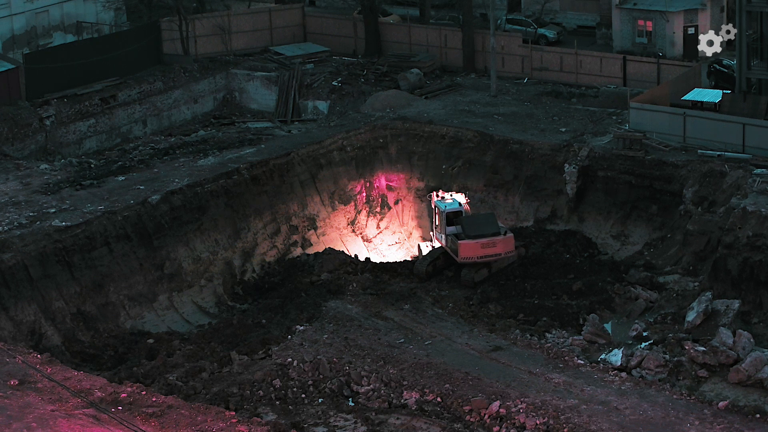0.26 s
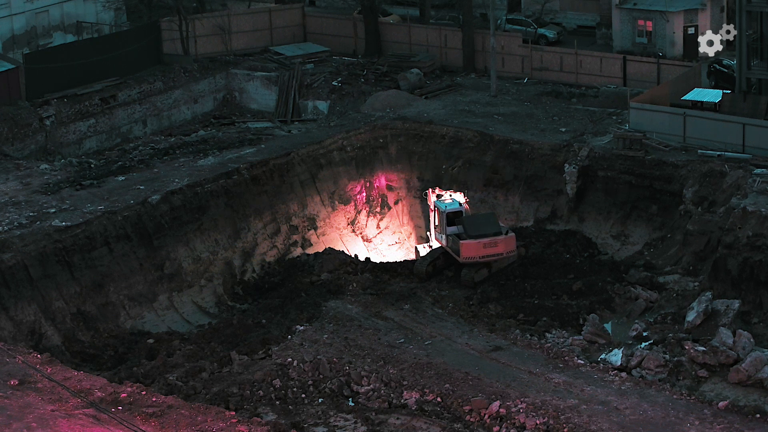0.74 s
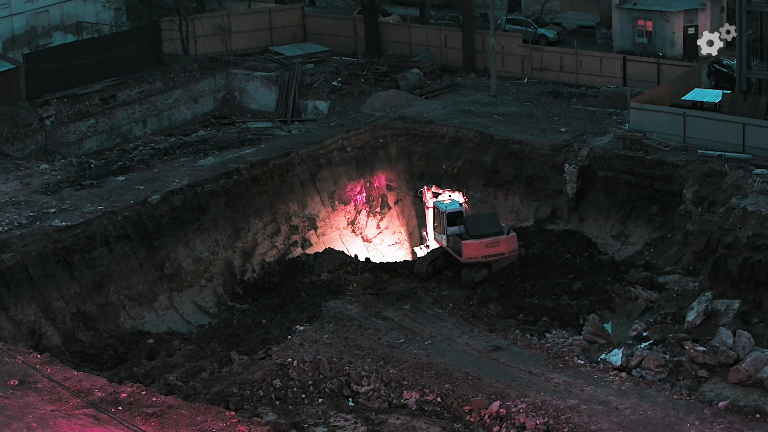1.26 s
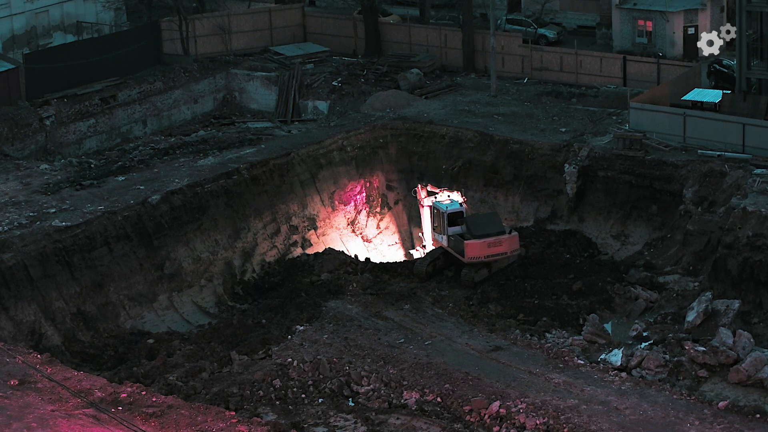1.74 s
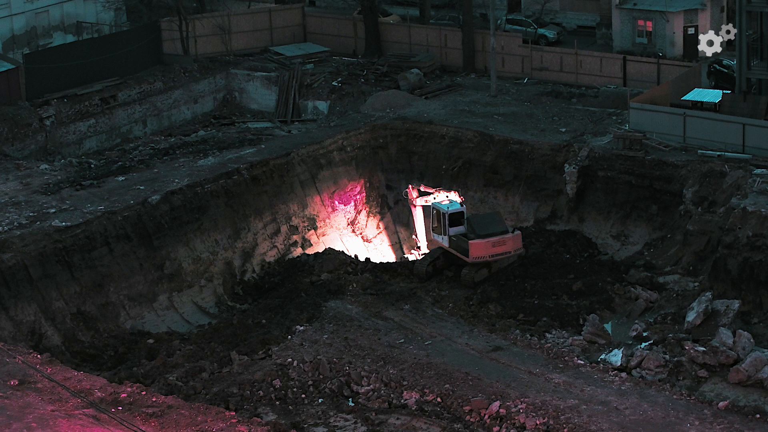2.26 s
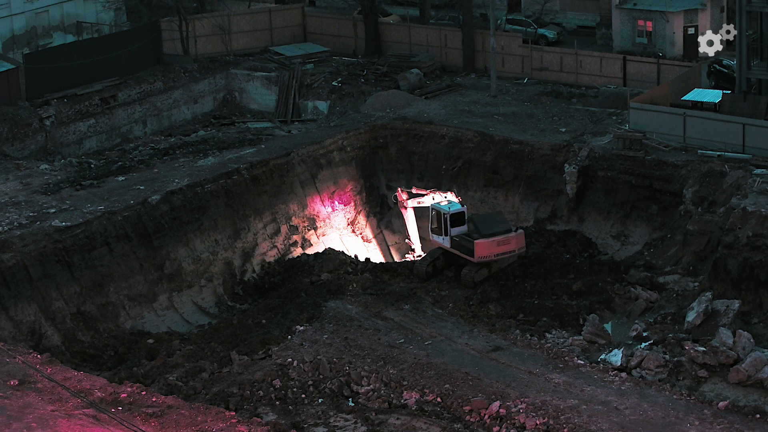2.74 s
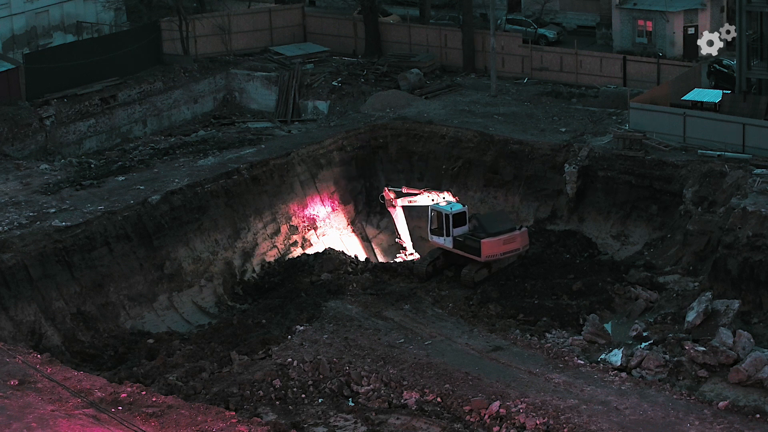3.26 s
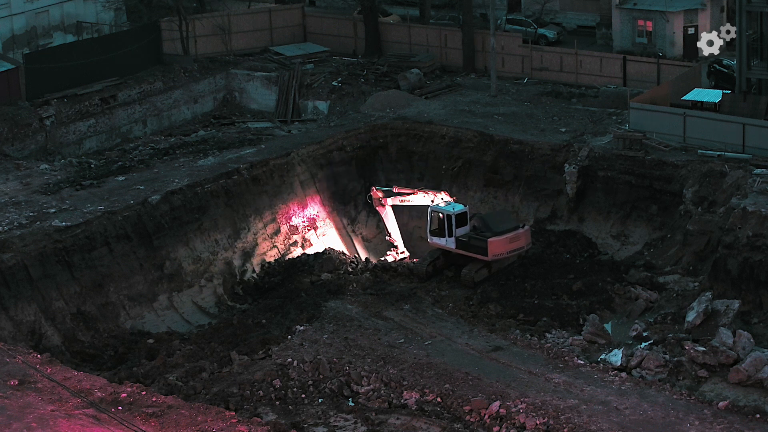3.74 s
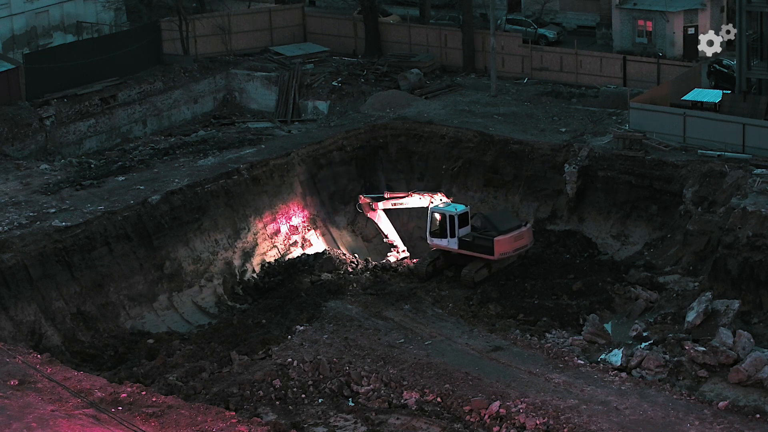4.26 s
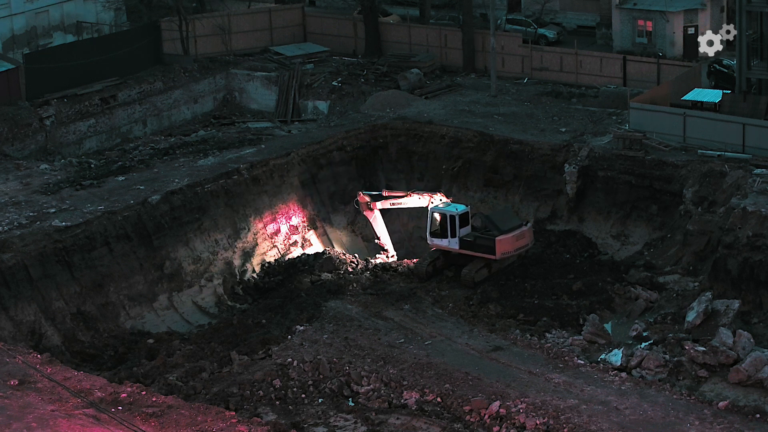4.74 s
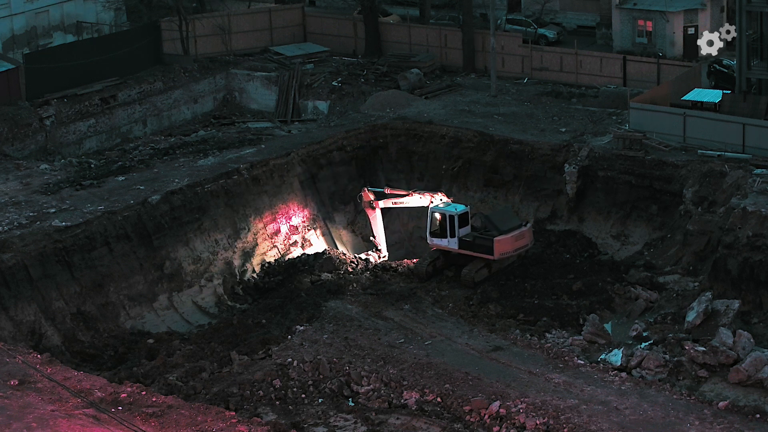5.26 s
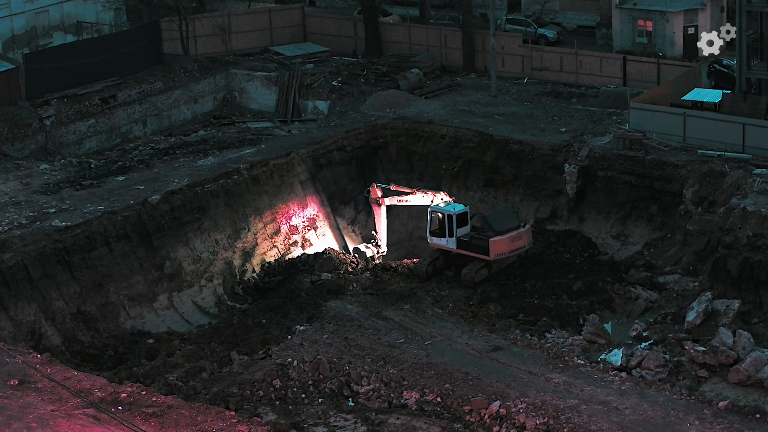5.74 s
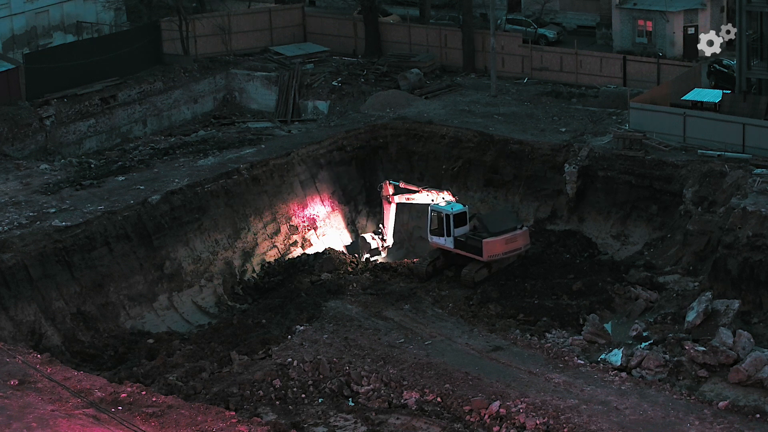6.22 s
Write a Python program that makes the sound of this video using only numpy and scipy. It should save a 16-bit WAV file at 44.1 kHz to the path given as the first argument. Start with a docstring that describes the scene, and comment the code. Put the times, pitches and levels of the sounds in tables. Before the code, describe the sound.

Strong wind thuds and rumbles on an unprotected microphone, heaviest in the first three seconds and distorting at its peaks. Beneath it, a distant diesel excavator drones steadily with a rough knock and hydraulic whine. After four seconds its steel bucket crunches through soil and stones with dull clanks and a faint squeal. The engine then continues in lighter wind. Outdoors, heard from far above an earth pit.

```python
"""A diesel excavator works at the bottom of a pit, heard from far above in gusty wind.
One shaft paces firing noise that rings the engine block, sines for the engine, gears and piston pump,
and puffed noise for exhaust and cooling air. The bucket's stones and soil are noise through steel
resonances. Wind in front is filtered noise in gusts that drives the microphone to its limits."""
import sys
import numpy as np
from scipy import signal
from scipy.fft import rfft, irfft, next_fast_len
from scipy.io import wavfile
from scipy.ndimage import uniform_filter1d, minimum_filter1d, map_coordinates

SR = 44100
rng = np.random.default_rng(int(sys.argv[2]) if len(sys.argv) > 2 else 0)


def voltage_ratio(level):
    """Linear amplitude factor for a level in decibels (scalar or array-like)."""
    return 10 ** (np.asarray(level, float) / 20)


def put_to_file(sound):
    """Save the sound as 16-bit audio at rate SR, in the file named by the first command-line argument."""
    columns = np.atleast_2d(sound).T  # one column per channel
    safe = np.clip(columns, -1, 1)
    whole_steps = np.round(safe * 32767)
    wavfile.write(sys.argv[1], SR, whole_steps.astype(np.int16))


N = 286341


def unit(x):
    """Normalisation: scale to rms 1."""
    return x / np.sqrt(np.mean(x ** 2) + 1e-20)


def curves(rows):
    """Linear interpolation: one value per sample for each column after the time."""
    s, *cols = np.transpose(rows)
    return [np.interp(np.arange(N) / SR, s, c) for c in cols]


def wobble(rate):
    """Band-limited randomness: a smooth spline through random knots, rate knots a second."""
    at = np.arange(0, N + 32, 32)
    knots = rng.standard_normal(int(N * rate / SR) + 4)
    return np.interp(np.arange(N), at, map_coordinates(knots, [at * rate / SR]))


def filtered(x, response):
    """Linear filtering: multiply the spectrum by a complex response of frequency."""
    m = next_fast_len(N + SR // 2)
    return irfft(rfft(x, m) * response(np.fft.rfftfreq(m, 1 / SR)), m)[:N]


def coloured(x, spectrum):
    """Spectral shaping: a filter through (Hz, dB) points on a log axis, brought to rms 1."""
    f, db = np.transpose(spectrum)
    return unit(filtered(x, lambda hz: voltage_ratio(np.interp(np.log(hz + 1), np.log(f + 1), db))))


def resonances(modes):
    """Modal superposition: causal response of (Hz, width Hz, dB) modes in alternating sign."""
    def response(f):
        total = 0
        for k, (centre, width, db) in enumerate(modes):
            damping = 1j * f * width
            total = total + (-1) ** k * voltage_ratio(db) * damping / (centre * centre - f * f + damping)
        return total
    return response


def steadied(x, share):
    """Envelope compression: even out part of a noise's own swelling, so the event sets its size."""
    x = unit(x)
    size = np.abs(signal.hilbert(x, next_fast_len(len(x)))[:len(x)])
    return unit(x / (size + 0.73) ** share)


def swell(s, length_s, rise_s, fall_s):
    """Event envelope: smooth rise centred on s, hold, exponential fall by two time constants in fall_s."""
    t = np.arange(N) / SR - s
    rise = np.sin(np.pi / 2 * np.clip(t / rise_s + .5, 0, 1)) ** 2
    return rise * np.exp(-np.clip(t - length_s, 0, None) / fall_s * 2)


def patchy(depth_db):
    """Random gain: noise with smooth patches of louder and softer level in time and pitch."""
    z = signal.stft(rng.standard_normal(N), nperseg=512)[2]
    field = uniform_filter1d(rng.standard_normal(z.shape), 6, axis=0)
    field = uniform_filter1d(field, 14, axis=1)
    return signal.istft(z * voltage_ratio(depth_db * unit(field)), nperseg=512)[1][:N]


def tone(turns, waver_db):
    """Sinusoid with random modulation: a phase in turns, level and phase wavering at random."""
    level = np.sqrt(2) * voltage_ratio(waver_db * wobble(8.4))
    return level * np.sin(2 * np.pi * turns + 1.91 * wobble(5))


def air(x):
    """Atmospheric absorption: the long path takes the top off sharp sounds."""
    return signal.sosfilt(signal.butter(5, 4600, fs=SR, output="sos"), x)


def pit(x):
    """Reverberation: the earth walls answer with a short dull tail."""
    t = np.arange(SR // 2) / SR
    tail = signal.lfilter([.4], [1, -.6], rng.standard_normal(len(t))) * voltage_ratio(-60 * t / 0.38)
    delayed = np.pad(x, (600, 0))
    return signal.fftconvolve(delayed, tail / np.linalg.norm(tail))[:N]


# single hard eddies inside the gusts: centre_s, level_db (before the pulse envelope), pitch_hz
EDDY_THUMPS = [(0.213, -16, 60), (0.251, -16, 55), (.62, -7.5, 60), (0.765, -11, 60.3), (1.044, -6.5, 48.6),
               (1.185, -13.5, 100), (1.288, -8.5, 52.6), (1.427, -10.5, 38.1), (1.964, -19, 40),
               (2.2, -11.5, 35), (2.3, -13.5, 35), (2.5, -9, 40), (2.555, -5, 40.5), (2.642, -6, 33),
               (2.662, -21.5, 150), (2.675, -15.5, 130), (2.694, -18, 140), (2.713, -13, 109.5),
               (2.735, -15, 121), (2.899, -15.5, 49.96), (3.023, -24, 120), (3.041, -9, 65.5),
               (3.165, -13, 37.97), (4.362, -20.5, 32), (4.89, -14, 35)]


def thumps():
    """Pressure pulse: each hard eddy swings the diaphragm once, out and then back in."""
    out, t = np.zeros(N + SR), np.arange(-SR // 10, SR // 10) / SR
    for s, db, hz in EDDY_THUMPS:
        pulse = np.sin(2 * np.pi * hz * t) * np.exp(-(1.92 * hz * t) ** 2)
        out[round(s * SR) - SR // 10:][:len(t)] -= voltage_ratio(db) * pulse
    return out[:N]


# gusts on the microphone: start_s, length_s, strength_db,
# quickness_db (how much small fast eddies gain on the large)
WIND_GUSTS = [(0, 0.0087, -22.5, -3), (0.125, 0.079, -24, -3), (0.183, 0.092, -21, 5.5),
              (0.258, 0.19, -21.5, 3.5), (0.408, 0.041, -27, 0), (0.524, 0.11, -19.5, 8),
              (0.638, 0.15, -20, 9), (0.786, 0.063, -15.5, 0), (0.895, 0.19, -16.5, 3.5),
              (1.07, .06, -10, -4), (1.148, 0.041, -18.5, 9.5), (1.23, 0.25, -20.5, 6),
              (1.324, 0.14, -26, 7), (1.471, 0.14, -23, 3.5), (1.66, 0.17, -32.5, 2),
              (1.949, 0.028, -18.5, -1.5), (2.088, 0.14, -27.5, -2.5), (2.274, 0.079, -17.5, -3.5),
              (2.4, 0.056, -27.5, -5), (2.504, 0.051, -11.5, -21), (2.594, 0.078, -9.5, -6),
              (2.655, 0.072, -21, 10.5), (2.777, 0.17, -18.5, -3), (3, 0.13, -19, 2.5),
              (3.121, 0.11, -19.5, -6.5), (3.325, 0.12, -23.5, -0.5), (3.509, 0.1, -30, 3.5),
              (3.673, 0.24, -19, -2), (3.966, 0.18, -17.5, -2), (4.214, 0.033, -15, -3.5),
              (4.331, 0.023, -14.5, -7.5), (4.422, 0.32, -24, -1), (4.78, 0.12, -22, 4),
              (4.94, 0.1, -19.5, 6), (5.021, 0.047, -24, 0), (5.116, 0.14, -23.5, -9),
              (5.402, 0.17, -25.5, -6.5), (6.001, 0.084, -27.5, -27), (6.212, 0.22, -27, -4)]
# relative spectra of large, middle and small eddies: frequency_hz, level_db
BUFFET_SPECTRUM = [(4.7, -31.5), (8.0, 9.5), (33, 7), (90, -20), (120, -16), (200, -120)]
FLUTTER_SPECTRUM = [(29, -36), (50, 0.5), (90, -6), (130, -21), (170, -46.5), (290, -120)]
RASP_SPECTRUM = [(80, -26), (125, 0.5), (200, -10), (280, -17.5), (420, -26.5), (560, -54), (990, -120)]
GUST_RISE_S, GUST_FALL_S = .07, 0.097
BREEZE_DB, BREEZE_QUICK_DB = -35.5, -7.5  # strength and quickness between gusts
FLUTTER_DB, RASP_DB = -9.5, -23.5  # relative to the buffet at zero quickness
FLUTTER_GROWS, RASP_GROWS = 0.93, 1.23  # share of the quickness each one gains


def gust_size(shapes, grows):
    """Energy addition: gusts and breeze sum as powers, each raised by its quickness."""
    db, quick_db = np.transpose(WIND_GUSTS)[2:]
    gusts = voltage_ratio(db + grows * quick_db) ** 2 @ shapes ** 2
    return np.sqrt(gusts + voltage_ratio(BREEZE_DB + grows * BREEZE_QUICK_DB) ** 2)


def wind():
    """Turbulent pressure: eddies of three sizes press on the diaphragm, the quick riding on the large."""
    shapes = np.array([swell(s, length_s, GUST_RISE_S, GUST_FALL_S) for s, length_s, _, _ in WIND_GUSTS])
    eddy = wobble(20)
    buffet = steadied(coloured(rng.standard_normal(N), BUFFET_SPECTRUM), share=0.21)
    flutter = steadied(coloured(rng.standard_normal(N), FLUTTER_SPECTRUM), share=0.13)
    rasp = coloured(voltage_ratio(1.4 * wobble(35)) * rng.standard_normal(N), RASP_SPECTRUM)
    push = gust_size(shapes, 0) * voltage_ratio(1.0 * eddy) * buffet
    push += gust_size(shapes, FLUTTER_GROWS) * voltage_ratio(FLUTTER_DB + 2.4 * eddy) * flutter
    push += gust_size(shapes, RASP_GROWS) * voltage_ratio(RASP_DB + 1.8 * eddy) * rasp
    push += thumps()
    return push / (1 + (push / .43) ** 4) ** (1 / 4)  # the diaphragm stiffens at full travel


# modes of the bucket steel: pitch_hz, width_hz, level_db
STEEL_MODES = [(482, 94, -3), (670, 85, 6), (838, 46, 1.5), (1065, 75, 4.5), (1510, 77, -2),
               (1640, 53, 4.5), (1940, 150, -11.5), (2280, 41, 1.5), (2710, 240, -4), (3180, 103.4, -6),
               (4000, 140, -12.5), (4350, 100, -1)]


def through_steel(x, direct):
    """Modal resonance: the bucket steel rings beside the direct sound."""
    ring = resonances(STEEL_MODES)
    return filtered(x, lambda hz: direct + ring(hz))


# bucket blows: start_s, level_db (before touch and steel), t60_s, centre_hz,
# spread (band edge over centre; narrow = one mode rings out)
STONE_BLOWS = [(3.482, -36, 0.15, 550, 2.7), (4.01, -39.5, 0.049, 900, 1.8),
               (4.106, -34.5, 0.081, 2550, 1.34), (4.107, -32.5, 0.051, 1065, 1.2),
               (4.12, -37.5, 0.2, 1700, 2.2), (4.148, -45, .06, 2200, 1.6),
               (4.176, -40.5, 0.21, 1000, 1.53), (4.339, -37, 0.077, 3000, 1.1),
               (4.349, -29.5, 0.03, 1640, 1.13), (4.352, -32, 0.14, 1470, 3.1),
               (4.36, -31, 0.066, 1065, 1.21), (4.368, -36, 0.086, 670, 1.3), (4.39, -42, 0.073, 810, 1.1),
               (4.435, -38, 0.041, 1065, 1.2), (4.518, -39, 0.068, 450, 2), (4.538, -43, .07, 880, 1),
               (4.525, -44, 0.11, 2600, 1.1), (4.553, -36.5, 0.085, 480, 1.5),
               (4.565, -38, 0.078, 1300, 1.5), (4.59, -42, .12, 2500, 2), (4.646, -42, .1, 2600, 1.2),
               (4.575, -33, 0.09, 500, 2.3), (4.597, -34.5, 0.083, 895.6, 1.4),
               (4.612, -36, 0.064, 1192, 1.4), (4.63, -35, .06, 1400, 1.6), (4.655, -35, 0.06, 1400, 1.34),
               (4.665, -35, 0.063, 600, 1.9), (4.69, -45, 0.059, 895, 2.5), (4.72, -39, .07, 800, 1.5),
               (4.782, -38.5, 0.086, 1065, 0.96), (4.792, -46, 0.14, 650, 0.92),
               (4.835, -37, 0.056, 700, 2.4), (4.86, -41, .05, 1190, 2), (4.915, -38, 0.055, 800, 1.3),
               (4.954, -47, 0.06, 700, 2.8)]


def stones():
    """Impact excitation: stones strike the bucket as short noise bursts that ring its steel."""
    t, rattle = np.arange(SR // 4) / SR, np.zeros(N + SR)
    touch = 1 + 1.5 * voltage_ratio(-60 * t / .02)  # hard first touch, then rubble
    onset = 1 - np.exp(-t / 0.0018)
    for s, db, t60, centre_hz, spread in STONE_BLOWS:
        spread = max(spread, 1.03)
        band = signal.butter(2, [centre_hz / spread, centre_hz * spread], "band", fs=SR, output="sos")
        noise = signal.sosfilt(band, rng.standard_normal(2 * len(t)))[len(t):]
        decay = voltage_ratio(db - 60 * t / t60)
        rattle[round(s * SR):][:len(t)] += decay * onset * touch * steadied(noise, share=.9)
    return through_steel(rattle[:N], direct=.3)


# soil sliding over the bucket: start_s, length_s, level_db
SOIL_SCRAPES = [(3.462, 0.034, -47), (4.085, 0.055, -50), (4.325, 0.022, -39.5), (4.52, 0.035, -42),
                (4.565, 0.066, -42), (4.666, 0.031, -43.5), (4.736, 0.16, -47), (4.892, 0.13, -51.5)]
# relative spectrum of the soil before the steel: frequency_hz, level_db
SOIL_SPECTRUM = [(120, -39), (200, -12.5), (285, 0.5), (324, -6.5), (364, -2), (1510, -12), (4260, -26.5),
                 (6000, -36), (7800, -82), (13200, -120)]


def soil():
    """Granular friction: random grain impacts crunch along the bucket and colour with its steel."""
    grains = (rng.random(N) < 700 * voltage_ratio(3 * wobble(40)) / SR) * rng.standard_normal(N)
    crunch = coloured(unit(grains) + .45 * rng.standard_normal(N), SOIL_SPECTRUM)
    crunch = unit(through_steel(crunch, direct=3.7))
    slide = sum(voltage_ratio(db) * swell(s, length_s, rise_s=0.065, fall_s=0.12) for s, length_s, db in SOIL_SCRAPES)
    return slide * voltage_ratio(1.2 * wobble(45)) * crunch  # soil comes in clods


# a tooth dragging free: time_s, pitch_hz, level_db (both jittered)
TOOTH_SQUEAL = [(4.76, 2680, -72), (4.8, 2640, -64), (4.88, 2600, -62), (4.93, 2700, -61.5),
                (5.0, 2940, -61), (5.03, 3060, -65), (5.065, 3220, -65), (5.09, 3400, -75)]


def squeal():
    """Frictional self-oscillation: a tooth sings one gliding, jittering tone as it drags free."""
    pitch_hz, level_db = curves(TOOTH_SQUEAL)
    sample = np.arange(N)
    dragging = (sample > TOOTH_SQUEAL[0][0] * SR) & (sample < TOOTH_SQUEAL[-1][0] * SR)
    turns = np.cumsum(pitch_hz + 35 * wobble(90)) / SR
    return dragging * voltage_ratio(level_db + 2 * wobble(45)) * np.sqrt(2) * np.sin(2 * np.pi * turns)


def bucket():
    """Superposition: stones, sliding soil and the squealing tooth add up at the bucket."""
    return stones() + soil() + squeal()


def piston_strokes(load, away):
    """Speed droop: hydraulic load slows the shaft, further after the swing; returns summed strokes."""
    free_hz, droop_hz, late_droop_hz = 220.16, 3.5, 6.2
    return np.cumsum(free_hz - (droop_hz + (late_droop_hz - droop_hz) * away) * load) / SR


def combustion(firing):
    """Pulsed combustion: each firing gives a fast rise and slower fall, and one sharp blow."""
    size = voltage_ratio(1.1 * rng.standard_normal(int(firing[-1]) + 1))[firing.astype(int)]
    phase = firing % 1
    burst = size * (1 - np.exp(-phase / 0.069)) * np.exp(-phase / 0.43)
    crack = unit(size * np.diff(np.floor(firing), prepend=0))
    return burst, crack


# relative spectrum of exhaust and fan: frequency_hz, level_db
ROAR_SPECTRUM = [(60, -30), (95, 5), (125, -6), (170, -8), (275, -2.5), (400, -9.5), (900, -9.5),
                 (2100, -15.5), (2400, -18.5), (5000, -25), (5500, -32), (8200, -37), (8800, -45),
                 (10600, -53), (13000, -99.5)]


def exhaust_roar(burst):
    """Amplitude modulation: exhaust and fan noise is puffed by each firing."""
    return coloured((1 + 0.082 * burst) * patchy(depth_db=1.5), ROAR_SPECTRUM)


# engine block modes: pitch_hz, width_hz (for one of two passes), level_db (relative)
BLOCK_MODES = [(1013, 100, 1), (1388, 120, 3), (1498, 138, 4.5), (1754, 85, -1.5), (1908, 140, 2),
               (2158, 150, -10), (2902, 67, -2), (3744, 480, -13), (4700, 160, -16), (7550, 1300, -27)]
UPPER_DB, SWUNG_UPPER_DB = 1.5, -1.1  # added to modes after the third, and their change by the swing


def block_knock(burst, crack, away):
    """Modal resonance: every firing rings the engine block, each mode with its own noise."""
    modes = []
    for hz, width, db in BLOCK_MODES:
        push = unit(burst * rng.standard_normal(N)) + .7 * crack
        mode = resonances([(hz, width, 0)])
        modes.append(voltage_ratio(db) * filtered(push, lambda f: mode(f) ** 2))
    # the upper modes beam, so they follow the swing of the cab
    return unit(sum(modes[:3]) + voltage_ratio(UPPER_DB + SWUNG_UPPER_DB * away) * sum(modes[3:]))


# engine tones: multiple of the shaft speed, level_db (at full load, before the swing)
ENGINE_ORDERS = [(2, -43.5), (4, -51), (6, -56.5), (12, -56), (48, -60.5)]


def engine_tones(shaft, load, away):
    """Engine orders: sines at whole multiples of the shaft speed swell under load."""
    change_db = -1.5 * away + 6.5 * (load - 1.0)
    return sum(voltage_ratio(db + change_db) * tone(k * shaft, waver_db=4.0) for k, db in ENGINE_ORDERS)


# timing and pump-drive gears, each with a partner one firing rate above:
# multiple of the shaft speed, level_db (before the swing and the firing bursts)
GEAR_TONES = [(60.6, -60.5), (62.6, -60.5), (78.9, -67), (80.9, -68), (119.2, -72.5), (121.2, -72.5)]


def gears(shaft, burst, shaded):
    """Gear meshing: tones tied to the shaft, with scattered phase, pulse with each firing."""
    total = 0
    for k, db in GEAR_TONES:
        turns = k * shaft + .25 * wobble(45)
        total = total + voltage_ratio(db - 8.5 * shaded) * tone(turns, waver_db=5.5) * (1 + .5 * burst)
    return total


# weaker pump harmonics: multiple of the piston rate, level_db
PUMP_HARMONICS = [(1, -57.5), (4, -64), (5, -61.5), (6, -61.5), (8, -65), (10, -72), (12, -73)]
# strong pump harmonics with no load, and their change at full load
SECOND_DB, SECOND_LOAD_DB, THIRD_DB, THIRD_LOAD_DB = -56, -6.5, -61.5, 12


def pump_whine(strokes, load):
    """Flow ripple: the piston pump whines at harmonics of its stroke rate, balanced by the load."""
    whine = voltage_ratio(SECOND_DB + SECOND_LOAD_DB * load) * tone(2 * strokes, waver_db=2.5)
    whine += voltage_ratio(THIRD_DB + THIRD_LOAD_DB * load) * tone(3 * strokes, waver_db=.6)
    for k, db in PUMP_HARMONICS:
        whine += voltage_ratio(db) * tone(k * strokes + .1 * wobble(25), waver_db=2.5)
    return whine


# relative spectrum of the cooling air's treble: frequency_hz, level_db
HISS_SPECTRUM = [(5500, -64), (7000, -8.5), (7800, 4), (8400, -9.5), (9500, -1), (10500, -14), (12000, -63)]


def cooling_hiss(burst, away):
    """Broadband flow noise: the treble of the cooling air, puffed by each firing."""
    level_db = -78.5 - 4.5 * away + 3.0 * wobble(2.8) + 1.5 * wobble(7)
    return voltage_ratio(level_db) * coloured((1 + burst) * patchy(depth_db=5.0), HISS_SPECTRUM)


def whistle(away):
    """Fixed-pitch sinusoid: a thin steady whistle emerges with the swing."""
    return away * voltage_ratio(-91) * tone(7870 * np.arange(N) / SR, waver_db=4)


def late_fan(burst):
    """Band resonance: a rough fan band, puffed by each firing, joins the engine late."""
    late = np.clip((np.arange(N) / SR - 5.4) / 0.36, 0, 1)
    band = resonances([(2050, 210, 0)])
    return late * voltage_ratio(-57) * unit(filtered((1 + burst) * rng.standard_normal(N), lambda f: band(f) ** 2))


# hydraulic load: time_s, share (0-1)
HYDRAULIC_LOAD = [(0, 0.48), (.3, 0.64), (.9, 0.56), (1.3, 0.37), (1.8, 0.54), (2.1, 0.91), (2.5, 0.99),
                  (2.95, 0.77), (3.3, 0.25), (4.0, 0.11), (4.3, 0.54), (4.8, 0.84), (5.05, .2), (5.45, 0.1),
                  (5.6, 0.98), (5.78, 0.81), (5.95, 0.41), (6.3, 0.95), (6.49, 0.51)]
# how well the gusty air carries roar and knock up from the pit: time_s, level_db
AIR_CARRY = [(0, -1), (.3, -0.1), (.6, -0.6), (.9, 1.3), (1.1, 0), (1.5, 1.2), (2.0, -0.7), (2.4, -1.2),
             (3.0, 0), (3.4, 1), (3.8, -1), (4.4, 0.4), (5.1, 0.1), (5.5, -1), (5.9, -0.2), (6.49, -0.4)]
SWING_S, SWING_LENGTH_S = 2.9, .8  # middle and length of the cab turning its engine side away
ROAR_DB, SWUNG_ROAR_DB = -44.5, -0.53  # level, and its change by the swing
KNOCK_DB, SWUNG_KNOCK_DB = -5.5, -2.5  # knock over the roar, and its change once hidden


def machine():
    """Phase locking: one shaft turns engine and pump, two firings and nine piston strokes a turn."""
    t = np.arange(N) / SR
    load, = curves(HYDRAULIC_LOAD)
    carry_db, = curves(AIR_CARRY)
    away = np.clip((t - SWING_S) / SWING_LENGTH_S + .5, 0, 1)
    shaded = np.clip((t - 1.9) / 1.5, 0, 1)  # the block is gradually hidden
    strokes = piston_strokes(load, away)
    shaft = strokes / 9
    burst, crack = combustion(2 * shaft)
    roar_db = ROAR_DB + SWUNG_ROAR_DB * away + carry_db + .4 * wobble(12)
    knock_db = KNOCK_DB + SWUNG_KNOCK_DB * shaded + 0.5 * wobble(5.1)
    body = exhaust_roar(burst) + voltage_ratio(knock_db) * block_knock(burst, crack, away)
    tones = engine_tones(shaft, load, away) + gears(shaft, burst, shaded) + pump_whine(strokes, load)
    return voltage_ratio(roar_db) * body + tones + cooling_hiss(burst, away) + whistle(away) + late_fan(burst)


def scene():
    """Superposition: wind at the microphone, bucket with its echo and machine down in the pit."""
    dig = air(bucket())
    return (wind() + dig + voltage_ratio(-11.5) * pit(dig) + machine())[None]


def roll_off(x):
    """The treble ends steeply here."""
    return signal.sosfilt(signal.butter(12, 10790, fs=SR, output="sos"), x)


def record(dry):
    """Dynamic compression and clipping: strong gusts briefly lower the gain and flatten at the ceiling."""
    threshold_db, ratio = -15, .45  # ratio: share taken off above the threshold
    average_s, hold_s, hold_shift_s, smooth_s = .05, .1, .04, .1
    lag_s = .05  # the gain control comes too late for the first peak
    power = np.abs(uniform_filter1d(dry[0] ** 2, size=round(average_s * SR)))
    loud_db = 10 * np.log10(power + 1e-12)
    need_db = -ratio * np.clip(loud_db - threshold_db, 0, None)
    held_db = minimum_filter1d(need_db, size=round(hold_s * SR), origin=round(hold_shift_s * SR))
    gain_db = uniform_filter1d(held_db, size=round(smooth_s * SR))
    mix = dry * voltage_ratio(np.pad(gain_db, (round(lag_s * SR), 0))[:N])
    ceiling = .405
    mix = np.clip(mix, -ceiling, ceiling)
    return roll_off(mix)


dry = scene()
out = record(dry)
put_to_file(out)
```